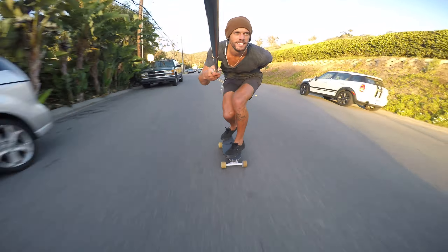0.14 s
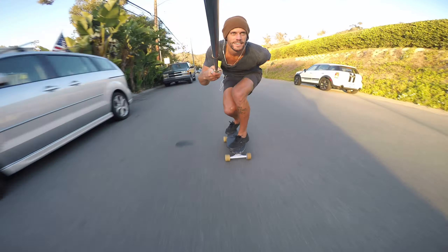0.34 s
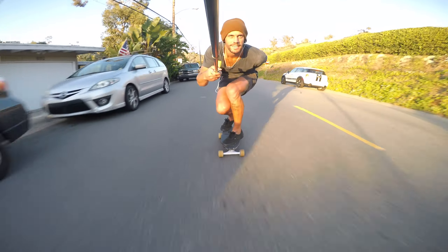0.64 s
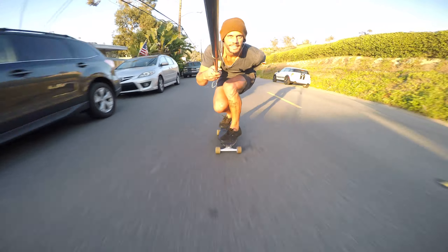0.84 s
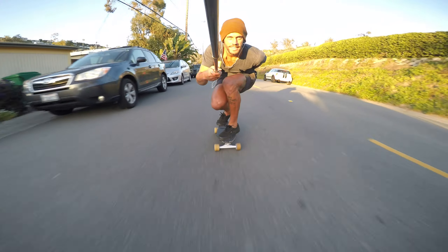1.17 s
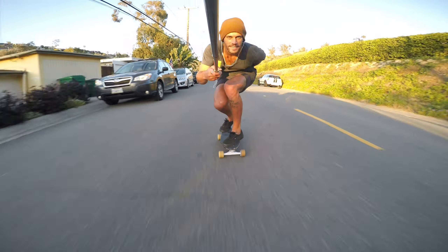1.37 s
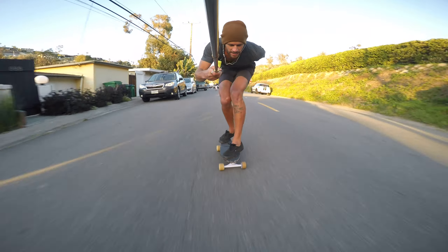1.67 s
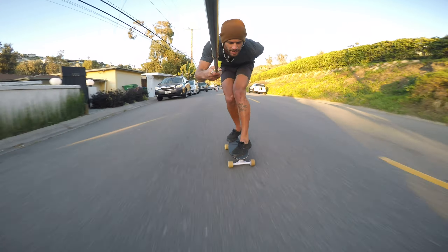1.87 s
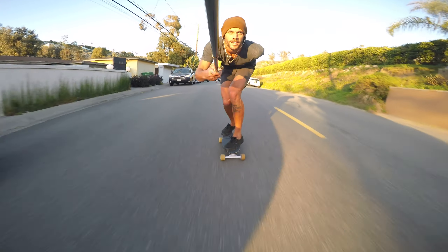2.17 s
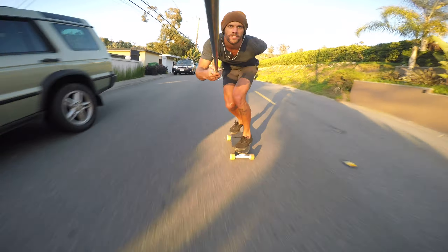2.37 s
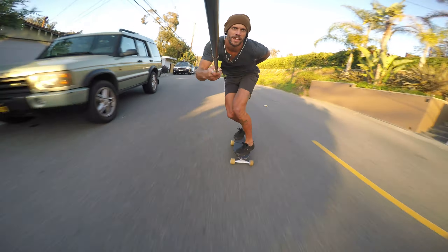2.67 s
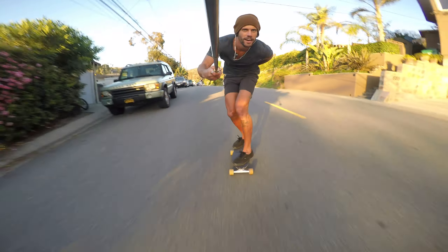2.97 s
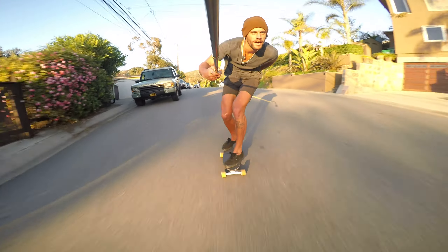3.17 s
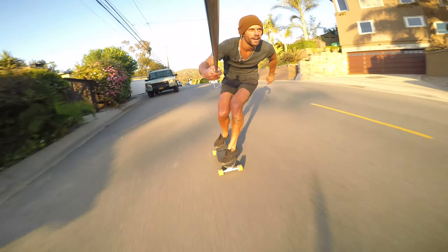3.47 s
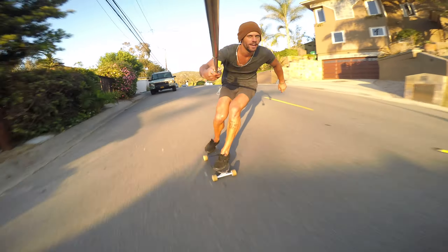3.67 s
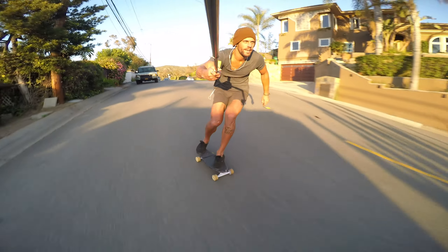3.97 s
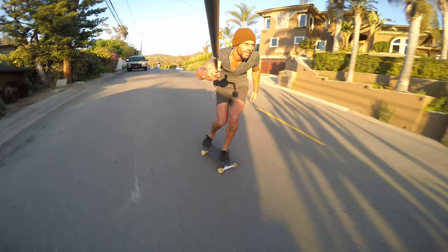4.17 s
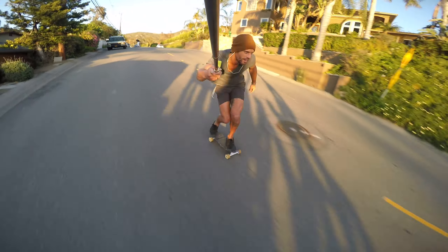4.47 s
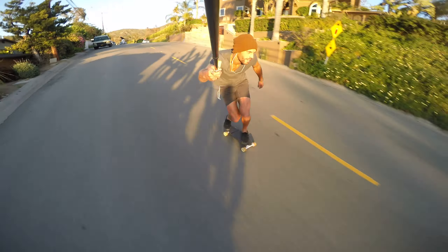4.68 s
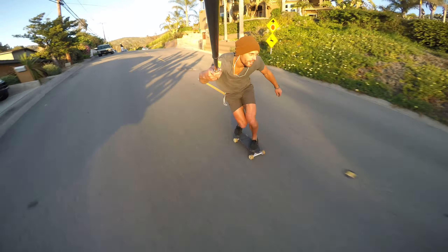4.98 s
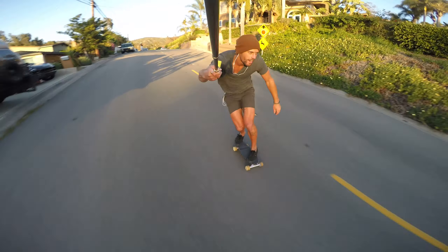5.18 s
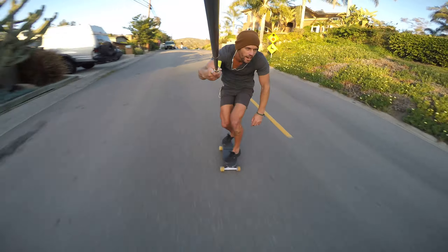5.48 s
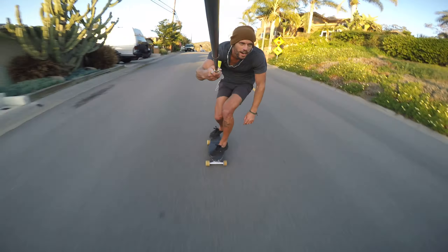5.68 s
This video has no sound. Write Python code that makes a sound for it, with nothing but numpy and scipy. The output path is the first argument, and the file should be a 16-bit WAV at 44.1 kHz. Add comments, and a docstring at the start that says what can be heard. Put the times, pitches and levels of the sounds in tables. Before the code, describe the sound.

Heavy low wind thumping over the steady grainy whir of skateboard wheels on pavement, with a pole knock, stone ticks and scrubbing carves.

```python
"""Longboard on asphalt

A longboard runs down a street, heard from a case on a pole in the rider's hand.
Random grains of road grit ring wheels, deck, pole and case through resonators; shaped grit scrubs and
hisses in the carves. Noise swinging about low rates makes the wind's buffeting and the pole's drone.
Clicks ring the pole when it is knocked, and wheel and deck when a stone is flicked."""
import sys
import numpy as np
from scipy import signal
from scipy.fft import rfft, irfft, next_fast_len
from scipy.io import wavfile
from scipy.ndimage import uniform_filter1d, map_coordinates

SR = 44100
rng = np.random.default_rng(int(sys.argv[2]) if len(sys.argv) > 2 else 0)


def materialize(psi):
    """Save the field psi as 16-bit PCM at rate SR to the path in sys.argv[1].

    A 1-D psi becomes a single channel; in a 2-D psi each row is a channel.
    """
    bounded = np.clip(np.atleast_2d(psi).T, -1, 1)
    quanta = np.round(bounded * 32767).astype(np.int16)
    wavfile.write(sys.argv[1], SR, quanta)


N = 257103   # length in samples
CUTOFF_HZ = 15000   # top of the whole sound

# Unevenness of the road, shaking the pole. Each row: time in seconds, relative level in dB.
POLE_SHAKE = [(0, -54), (.55, -47.5), (1.35, -50), (1.6, -46), (1.95, -50.5), (2.3, -47.5), (3.2, -48),
              (3.55, -51.5), (4.1, -54), (4.5, -47.5), (4.9, -47.5), (5.83, -48)]
# Coarseness of the asphalt, as wheel roar. Each row: time in seconds, relative level in dB.
ROAD_COARSENESS = [(0, -46), (.12, -43.5), (.6, -43.5), (1.6, -44), (1.8, -41.5), (2.0, -44), (2.55, -41),
                   (2.66, -43), (2.78, -39.5), (3.03, -45.5), (3.3, -41.5), (3.55, -43), (4.0, -37.5),
                   (4.2, -46), (4.45, -44.5), (5.4, -42.5), (5.75, -39.5)]
# How far the board is ridden on the wheel edges. Each row: time in seconds, share from 0 to 1.
EDGE_LEAN = [(0, 0.27), (3.1, 0), (3.8, 0), (4.03, 0.44), (4.2, 0.47), (4.7, 0.86), (5.2, 0.84), (5.5, 0.6),
             (5.83, 0.8)]
# Fine road texture reaching the case. Each row: time in seconds, sizzle level in dB.
CASE_SIZZLE = [(0, -52), (.72, -51), (.87, -53), (1.35, -51), (2.05, -53.3), (2.5, -51), (2.8, -51.3),
               (3.04, -54), (3.55, -51), (4.3, -53.5), (4.95, -53.5), (5.13, -50.5), (5.35, -53),
               (5.83, -51.5)]
# Pole resonances under the rolling. Each row: frequency in Hz, nominal width in Hz, relative level in dB.
POLE_BANDS = [(163, 22, -13.5), (203.7, 16.5, 0.5), (262, 73, -15), (304.3, 27.6, -8), (452, 240, -17.5)]
# Deck resonances. Each row: frequency in Hz, nominal width in Hz, relative level in dB.
DECK_BANDS = [(557, 210, 2.5), (605, 340, 0.5), (954, 210, -1)]
# Tread resonances. Each row: frequency in Hz, nominal width in Hz, relative level in dB.
TREAD_BANDS = [(1276, 267, -0.5), (1572, 158, 2.4)]
# Wheel resonances. Each row: frequency in Hz, nominal width in Hz, relative level in dB.
WHEEL_BANDS = [(1785, 88, 2.5), (1943, 110, 3), (2194, 184, 1), (2470, 380, -5.5), (2693, 110, -5.5)]
# A wheel ridden on its edge. Each row: frequency in Hz, nominal width in Hz, relative level in dB.
EDGE_BANDS = [(689, 135, -1), (2280, 140, -1), (3635, 260, -2)]
# Main case resonances. Each row: frequency in Hz, nominal width in Hz, relative level in dB.
CASE_BANDS = [(3595, 350, -2.5), (3800, 140, -0.5)]
# Faint high case resonances. Each row: frequency in Hz, nominal width in Hz, relative level in dB.
CASE_HIGH_BANDS = [(4290, 300, 2), (4560, 540, 1.5), (5460, 340, -5), (6160, 360, -7), (6490, 260, -8),
                   (7100, 440, -10.5), (7660, 320, -12)]

# Sideways drag of the wheels in the carves. Each row: time in seconds, relative strength in dB.
SIDE_DRAG = [(0.05, -53), (0.56, -60), (2.25, -60), (2.75, -56), (3.02, -60.5), (3.5, -54), (3.62, -49),
             (3.99, -54), (4.04, -52), (4.31, -66), (4.63, -60), (5.27, -57.5), (5.73, -44), (5.78, -44.5)]
# Urethane scrubbing sideways. Each row: frequency in Hz, relative level per Hz in dB.
SCRUB_SPECTRUM = [(700, -13), (1300, -3), (2400, -3.5), (3000, 1.5), (3350, -3.5), (3650, 7.5), (3850, 3),
                  (4050, -5.5), (5200, -25), (7200, -20), (8200, -47)]
# Brief slides of a wheel. Each row: middle in seconds, length in seconds, peak hiss level in dB.
WHEEL_SLIDES = [(1.2, .3, -71), (3.6, 0.51, -67), (3.92, 0.24, -59), (5.63, 0.24, -66)]
# Hiss of a sliding wheel. Each row: frequency in Hz, relative level per Hz in dB.
SKID_SPECTRUM = [(4500, -14.5), (6400, 3), (7100, 10), (7800, 4.5), (8250, -8), (8850, 4), (9500, 0),
                 (10400, 0.5), (11000, -8), (11800, -4), (14300, -8), (15500, -11.5)]

# Stones under a wheel. Each row: time in seconds, strength in dB.
STONE_HITS = [(2.357, -1), (4.7951, -2)]
# Wheel and deck rung by a stone. Each row: frequency in Hz, relative level in dB, 60 dB decay in seconds.
STONE_RING = [(570, -43, 0.041), (704, -31, 0.033), (960, -32.5, 0.04), (1850, -31.5, .03),
              (2020, -25, 0.033), (2670, -42, 0.0088)]
# Knocks on the pole. Each row: time in seconds, strength in dB, contact cut-off in Hz.
POLE_KNOCKS = [(3.78, 1, 990), (4.76, -11, 650.5), (4.7965, -9.5, 2400)]
# The pole rung by a knock. Each row: frequency in Hz, relative level in dB, 60 dB decay in seconds.
KNOCK_RING = [(75, -8, 0.15), (205, -19.5, 0.2), (301, -21.5, 0.11), (501, -16, 0.021), (810, -25.5, 0.028)]

# Steady buffeting between the gusts. Each row: time in seconds, relative level in dB.
STEADY_AIRFLOW = [(0, -23.5), (1.4, -26), (2, -27.5), (3.9, -22.5), (4.6, -26.5), (5.83, -17.5)]
# Gusts on the case. Each row: middle in seconds, length in seconds, relative peak level in dB.
CASE_GUSTS = [(.12, 0.031, -15.5), (.21, 0.038, -18.5), (.31, 0.051, -25.5), (.67, 0.067, -24.5),
              (1.47, 0.051, -16.5), (1.635, 0.045, -16.5), (2.58, 0.054, -19), (2.89, .09, -17.5),
              (3.17, 0.067, -21), (3.29, 0.041, -23), (3.44, .09, -23), (3.585, 0.034, -16.5),
              (3.87, 0.059, -17.5), (4.145, 0.032, -12.5), (4.24, .04, -26), (4.35, 0.17, -16.5),
              (4.54, 0.075, -18.5), (4.79, 0.045, -17.5), (5.46, 0.051, -17), (5.71, 0.038, -16.5)]
# Moments when the steady buffeting drops away. Each entry: middle in seconds.
LULL_TIMES = [0.02, .75, .82, 1.29, 1.39, 1.79, 1.97, 2.44, 2.79, 3.09, 3.68, 3.96, 4.06, 4.86, 5.4]
LULL_S, LULL_DB = 0.044, -8   # length and depth of each lull
# The pole's drone, faint until it swells in the long turn. Each row: time in seconds, relative level in dB.
DRONE_SWELL = [(0, -35), (3.1, -34), (3.39, -29.5), (3.7, -32), (4.08, -33), (4.24, -16.5), (4.36, -38),
               (4.44, -22), (4.64, -10), (4.85, -18), (4.94, -9), (5.08, -29), (5.16, -12), (5.26, -15.5),
               (5.33, -27), (5.55, -23), (5.83, -35)]
# Vortex shedding, faster as air speed across the pole rises. Each row: time in seconds, rate in Hz.
SHEDDING_RATE = [(0, 74.6), (1.0, 77), (2.0, 77.9), (3.8, 74.48), (4.2, 61.82), (4.45, 70.38), (4.6, 75.8),
                 (4.95, 74.4), (5.25, 70.7), (5.5, 65.2), (5.83, 64.96)]
# Small eddies at the case. Each row: frequency in Hz, relative level per Hz in dB.
SWIRL_SPECTRUM = [(40, -17), (70, -6.5), (95, -1), (120, -13), (150, -16), (250, -43), (600, -68)]
# Air rushing past the case. Each row: frequency in Hz, relative level per Hz in dB.
RUSH_SPECTRUM = [(2500, -3), (7000, 6), (8200, 7), (8800, 9), (9700, 3.5), (11000, 2.5), (12000, 4.5),
                 (14200, 4), (15200, -13)]


def rolling(turn_hz=55, throb=0.034, patchy_db=0.39, growl_lean_db=-3.5, edge_lean_db=12.5,
            deck_follow=0.39):
    """Road grain shakes pole, deck, wheels and case; the contact throbs unevenly near the wheel-turn rate."""
    shake_db, = in_time(POLE_SHAKE)
    road_db, = in_time(ROAD_COARSENESS)
    lean, = in_time(EDGE_LEAN)
    sizzle_db, = in_time(CASE_SIZZLE)
    coarse_db = road_db - np.mean(road_db) + patchy_db * flutter(rate_hz=11)
    deck_db = -52.5 + deck_follow * (shake_db - np.mean(shake_db))

    pole = from_db(shake_db + 2.0) * rolled(POLE_BANDS)
    deck = from_db(deck_db) * rolled(DECK_BANDS)
    wheels = from_db(-45.0 + coarse_db) * rolled(WHEEL_BANDS)
    # leaning takes the load off the tread and puts it on the wheel edges
    tread = from_db(-46.5 + coarse_db + growl_lean_db * lean) * rolled(TREAD_BANDS)
    edges = from_db(-55.0 + edge_lean_db * lean) * rolled(EDGE_BANDS)
    case = from_db(-53.0) * rolled(CASE_BANDS) + from_db(sizzle_db) * rolled(CASE_HIGH_BANDS)
    contact = 1 + throb * rms_one(resonate(rng.standard_normal(N), turn_hz, 35))
    return pole + contact * (deck + wheels + tread + edges + case)


def carving(scrub_db=-50.0, bite=1.08, deck_db=-58.5, deck_follow=0.85):
    """Turning drags the urethane sideways over the grain and shakes the deck; brief wheel slides hiss."""
    drag_db, = in_time(SIDE_DRAG)
    effort_db = drag_db - np.mean(drag_db)
    scrub = from_db(scrub_db + bite * effort_db) * colour(grit(), SCRUB_SPECTRUM)
    deck = from_db(deck_db + deck_follow * effort_db) * rolled(DECK_BANDS)
    skid = np.sqrt(swells(WHEEL_SLIDES)) * colour(grit(), SKID_SPECTRUM)
    return scrub + deck + skid


def stones(contact_hz=3500):
    """A stone ticks against the soft urethane and rings wheel and deck."""
    ticks = sum(click(s, db) for s, db in STONE_HITS)
    return struck(soften(ticks, contact_hz), STONE_RING)


def knocks():
    """Short blows ring the pole; a softer contact drives the high modes less."""
    blows = sum(soften(click(s, db), cut_hz) for s, db, cut_hz in POLE_KNOCKS)
    return struck(blows, KNOCK_RING)


def wind(buffet_hz=35, top_hz=112, swirl_db=-42, swirl_follow=0.089, unrest_db=3.5,
         drone_gain_db=-0.2, drone_waver_db=3.5):
    """Big eddies buffet the case and vortices drone off the pole, over small eddies and a faint rush of air."""
    flow_db, = in_time(STEADY_AIRFLOW)
    drone_db, = in_time(DRONE_SWELL)
    shed_hz, = in_time(SHEDDING_RATE)

    lull_db = LULL_DB * swells([(s, LULL_S, 0) for s in LULL_TIMES])
    unrest = unrest_db * np.minimum(flutter(rate_hz=15), 1)
    steady_power = from_db(flow_db + lull_db + unrest) ** 2
    buffet_db = 10 * np.log10(steady_power + swells(CASE_GUSTS))
    buffet = from_db(buffet_db + 1.26) * eddies(buffet_hz, width=36.5, even_s=0.067)

    # weak shedding wavers; strong shedding locks into a steadier tone
    waver = 1 - from_db(drone_db - np.max(drone_db))
    loose = waver ** 2
    loose_vortices = np.sqrt(loose) * eddies(shed_hz, width=24.5, even_s=0.085)
    locked_vortices = np.sqrt(1 - loose) * eddies(shed_hz, width=11.8, even_s=0.06)
    drone_level_db = drone_db + drone_gain_db + drone_waver_db * waver * flutter(rate_hz=25)
    drone = from_db(drone_level_db) * (loose_vortices + locked_vortices)

    # the case lets only the bass of buffeting and drone through
    bass = signal.butter(3, top_hz, fs=SR, output="sos")
    rumble = signal.sosfiltfilt(bass, buffet + drone)
    swirl_level_db = swirl_db + swirl_follow * (buffet_db - np.mean(buffet_db))
    swirl = from_db(swirl_level_db) * colour(rng.standard_normal(N), SWIRL_SPECTRUM)
    rush = from_db(-67.5) * colour(rng.standard_normal(N), RUSH_SPECTRUM)
    return rumble + swirl + rush


def grit(per_s=14000, spread_db=4.0):
    """Tiny random impacts of road grains, of uneven size and either sign."""
    size_db = spread_db * np.minimum(rng.exponential(1, N), 5)
    sizes = from_db(size_db) * rng.choice([-1, 1], N)
    return sizes * (rng.random(N) < per_s / SR)


def rolled(bands):
    """Grains of its own excite each resonance of a body; the sum has rms 1."""
    return rms_one(sum(from_db(db) * resonate(grit(), hz, width) for hz, width, db in bands))


def resonate(x, hz, width):
    """A band resonance applied twice, so that its skirts are steep."""
    r = np.exp(-np.pi * width * np.sqrt(2) / SR)
    b = (1 - r * r) / 2 * np.array([1, 0, -1])
    a = [1, -2 * r * np.cos(2 * np.pi * hz / SR), r * r]
    return signal.lfilter(b, a, signal.lfilter(b, a, x))


def click(s, db):
    """One single-sample blow at a given moment."""
    return from_db(db) * signal.unit_impulse(N, round(s * SR))


def soften(x, cut_hz):
    """A soft contact rounds a blow: two gentle low-passes in a row."""
    r = np.exp(-2 * np.pi * cut_hz / SR)
    return signal.lfilter([(1 - r) ** 2], [1, -2 * r, r * r], x + 1e-18)


def struck(blows, modes):
    """Blows set every mode of a body ringing."""
    return sum(from_db(db) * ring(blows, hz, t60) for hz, db, t60 in modes)


def ring(clicks, hz, t60):
    """A unit click starts a decaying sine of height about 1."""
    r = np.exp(-np.log(1000) / (t60 * SR))
    w = 2 * np.pi * hz / SR
    return signal.lfilter([0, np.sin(w)], [1, -2 * r * np.cos(w), r * r], clicks + 1e-18)


def eddies(hz, width, even_s):
    """Pressure swings unevenly about a rate, with its slow level changes evened out."""
    size = next_fast_len(N)
    offset_hz = np.fft.fftfreq(size, 1 / SR)
    chance = rng.standard_normal(size) + 1j * rng.standard_normal(size)
    swing = np.fft.ifft(chance / (1 + (2 * offset_hz / width) ** 2) ** 2)[:N]
    power = uniform_filter1d(np.abs(swing) ** 2, max(int(even_s * SR), 1))
    phase = 2 * np.pi * np.cumsum(hz * np.ones(N)) / SR
    return np.sqrt(2 / power) * np.real(swing * np.exp(1j * phase))


def colour(x, spectrum):
    """Give a steady sound a spectrum; rms 1."""
    size = next_fast_len(N)
    hz, db = np.transpose(spectrum)
    bins = np.maximum(np.arange(size // 2 + 1) * SR / size, 1)
    gain = from_db(np.interp(np.log(bins), np.log(hz), db))
    return rms_one(irfft(rfft(x, size) * gain, size)[:N])


def swells(rows):
    """Power of bell-shaped surges; a length is the time spent above half power."""
    t = np.arange(N) / SR
    return sum(from_db(db) ** 2 * .5 ** ((2 * (t - s) / length) ** 2) for s, length, db in rows)


def flutter(rate_hz):
    """Slow random wavering through rate_hz random points a second; rms 1."""
    knots = rng.standard_normal(N // 100)
    return rms_one(map_coordinates(knots, [np.arange(N) / SR * rate_hz], order=2, mode="wrap"))


def in_time(rows):
    """Each column of a curve at every sample."""
    s, *columns = np.transpose(rows)
    return [np.interp(np.arange(N) / SR, s, c) for c in columns]


def from_db(db):
    """Decibels to gain."""
    return 10 ** (np.asarray(db) / 20)


def rms_one(x):
    """Scale to unit power."""
    return x / np.sqrt(np.mean(x ** 2) + 1e-20)


def scene():
    """Board, pole and wind add up in the open air, with no echo."""
    board = rolling() + carving() + stones()
    return (board + knocks() + wind())[None]


def record(dry):
    """The top is cut steeply."""
    low_pass = signal.ellip(10, .1, 80, CUTOFF_HZ, fs=SR, output="sos")
    return signal.sosfilt(low_pass, dry)


dry = scene()
out = record(dry)
materialize(out)
```